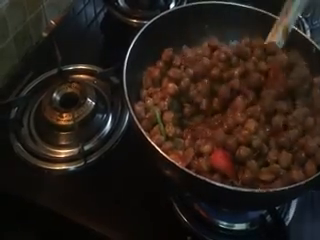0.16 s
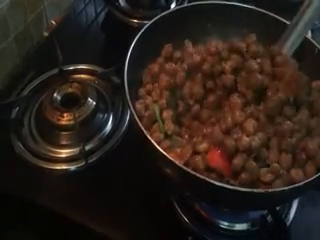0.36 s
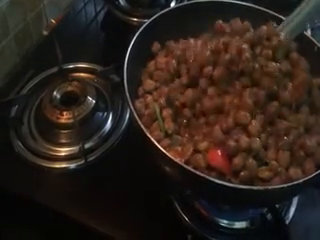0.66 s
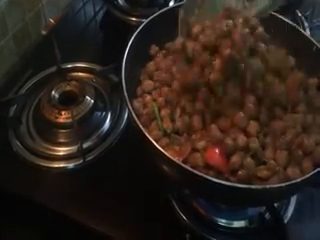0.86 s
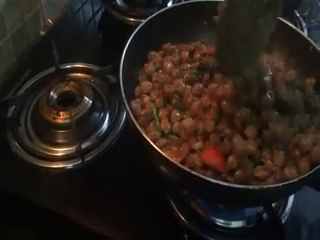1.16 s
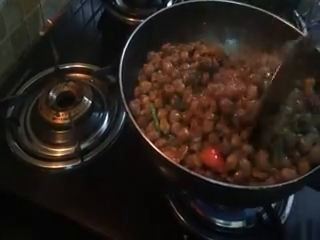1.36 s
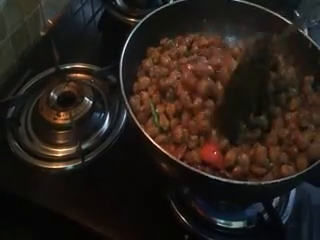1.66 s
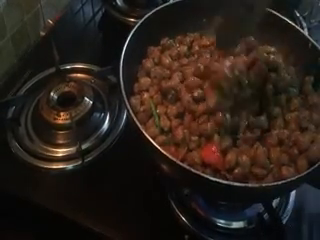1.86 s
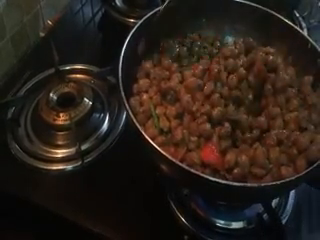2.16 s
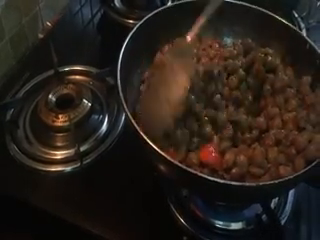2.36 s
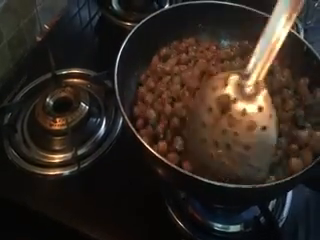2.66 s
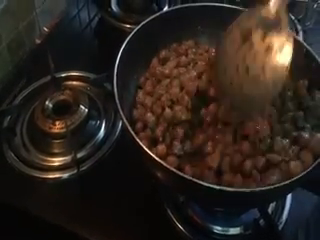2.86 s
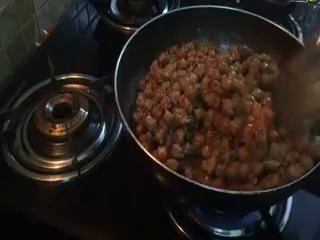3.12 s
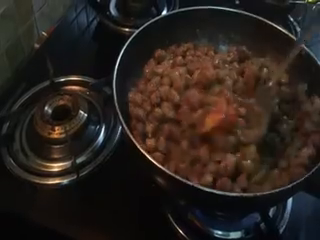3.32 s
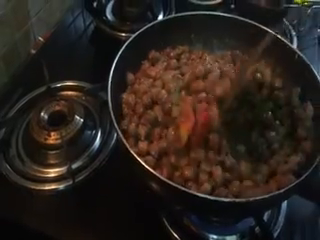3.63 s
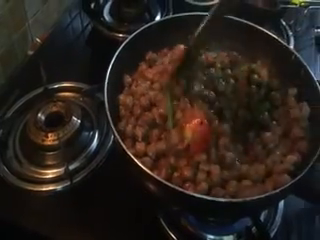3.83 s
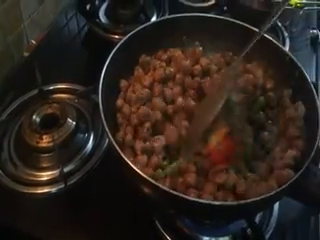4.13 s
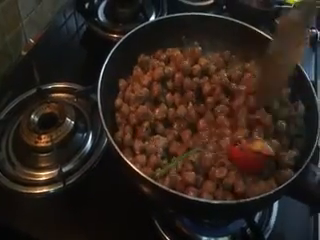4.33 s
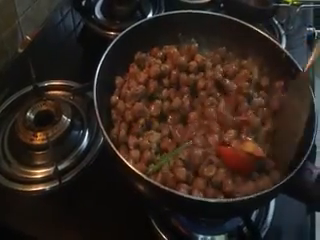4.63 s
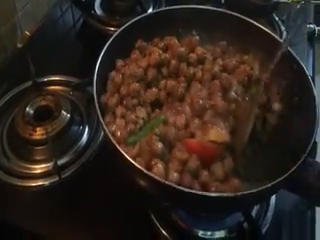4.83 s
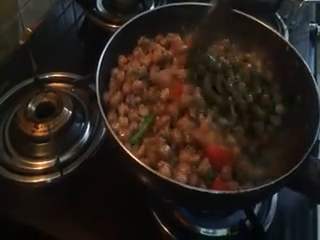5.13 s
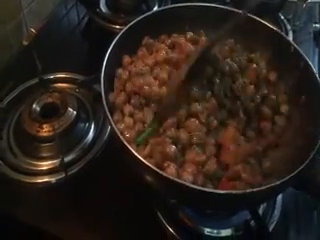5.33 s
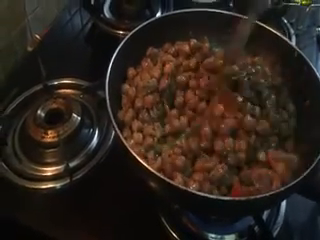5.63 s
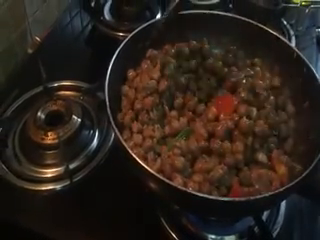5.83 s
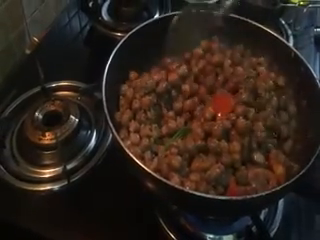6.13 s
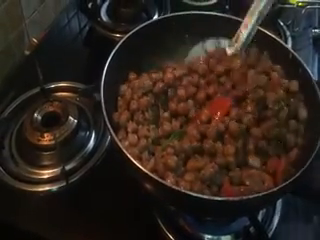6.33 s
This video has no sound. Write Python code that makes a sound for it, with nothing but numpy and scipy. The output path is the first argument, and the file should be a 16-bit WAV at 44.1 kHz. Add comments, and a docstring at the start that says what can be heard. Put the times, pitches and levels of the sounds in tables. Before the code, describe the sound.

Close to a pan of wet chickpeas in a small home kitchen, one microphone catches frying hiss over a faint low hum and rumble. The sizzle starts strong and fades quickly. Separate bright clacks and gritty scrapes of a steel skimmer follow, with short hollow ringing from the pan. Tiny droplets and fat pops crackle. After a quieter stretch come dull low thuds, another scrape, and a renewed burst of sizzling.

```python
"""Wet chickpeas sizzle in a deep steel pan on a gas ring, over a mains hum and a low roar.
A steel skimmer turns them over: strokes rub the pan's modes, blows and short scrapes ring pan and skimmer.
The sizzle is shaped noise with droplet clicks and bubble tones; a hollow band and fat pops stand out.
Low thuds are decaying sines; the kitchen answers the blows and short scrapes. One microphone feeds both
channels."""
import sys
import numpy as np
from scipy import signal
from scipy.fft import rfft, irfft, next_fast_len
from scipy.io import wavfile
from scipy.ndimage import uniform_filter1d, map_coordinates

SR = 44100
rng = np.random.default_rng(int(sys.argv[2]) if len(sys.argv) > 2 else 0)


def to_wav(sig):
    """Store sig (one row per channel, or 1-D mono) as 16-bit WAV at the path in sys.argv[1].

    Samples outside -1..1 are clipped; the rate is SR.
    """
    pcm = np.clip(np.atleast_2d(sig), -1, 1) * 32767
    pcm = np.round(pcm).astype(np.int16)
    wavfile.write(sys.argv[1], SR, pcm.T)  # frames by channels


N = 285755

# Frying strength; dies down after the water, flares when a stroke bares hot steel: time_s, level_db
FRY_LEVEL = [(0, -25), (.23, -25), (.36, -28), (.99, -32.5), (1.5, -34), (1.62, -34.5), (2.1, -34.5),
             (2.25, -31.5), (2.45, -33), (2.88, -35.5), (3.06, -35), (3.18, -34.5), (3.33, -31.5),
             (3.5, -35), (4.05, -35.5), (4.14, -37.5), (4.47, -38), (4.59, -34), (4.95, -38), (5.04, -36),
             (5.15, -37.5), (5.23, -35.5), (5.275, -38.5), (5.32, -36), (5.81, -37.5), (5.855, -42),
             (5.91, -39), (5.98, -37), (6.2, -33), (6.3, -28), (6.4, -27.5), (6.48, -31)]
# Sizzle colour: time_s, tilt_db_per_octave, hollow_db (re sizzle), pinched_share (0-1)
SIZZLE_COLOUR = [(0, 0, -8.5, .1), (.4, 0.9, -8, 0.3), (.75, 0, -9, .3), (1.0, 0.3, -12.5, .2),
                 (1.3, 1.1, -7.5, 0.1), (1.5, 2, -4, 0.2), (1.65, 0.3, -13.5, .2), (2.3, 2, -13, .2),
                 (2.6, 0, -8, .2), (2.8, 0.5, -17, .3), (4.4, 0.3, -11.5, 0.7), (5.05, 2, -10.5, 0.3),
                 (5.3, 3, -12.5, .4), (5.62, 1, -14, 0.9), (5.72, 2, -7, 0.9), (5.88, 0, -7.5, .8),
                 (5.95, -2.5, -9.5, .8), (6.2, 5, -6, 0.74), (6.32, 2.5, -12, .5), (6.48, 1.5, -11, .4)]
# Spectrum of steam and fat: freq_hz, density_db (per Hz)
FIZZ_SPECTRUM = [(250, -40), (520, -35), (850, -19), (1150, -9), (1600, -9.5), (2300, -9), (2450, -7.5),
                 (2650, -11), (2900, -8.5), (3150, -7.5), (4250, -6.5), (5000, -8.5), (5800, -6),
                 (8800, -11.5), (12000, -18.5), (15800, -28.5)]
# Modes of the pan: freq_hz, width_hz, gain_db
PAN_MODES = [(300, 160, 2), (544, 30, 6.5), (705, 37, 5), (862, 126, -4), (930, 26, -1), (1034, 41, 2.5),
             (1157, 44, -3), (1237, 67, -3.5), (1702, 34, -6), (1818, 75, -2.5), (2158, 60, 1),
             (2667, 48, -5.5), (3244, 47, -6), (3680, 80, -8), (4410, 51, -2), (5500, 110, -13),
             (6540, 100, -20), (7300, 110, -24), (8730, 140, 3.5), (9430, 120, 2)]
# Skimmer strokes along the steel: start_s, length_s, level_db
SKIMMER_STROKES = [(-.05, 0.43, -41.5), (0.444, 0.18, -51), (2.313, 0.14, -44.5), (2.997, 0.072, -40.5),
                   (3.174, 0.17, -38), (4.544, .3, -45.5), (6.043, 0.21, -42), (6.22, .35, -41.5)]
# Motor tones: freq_hz, level_db (re hum level)
HUM_TONES = [(85.4, -12.5), (100, 0.5), (129, -12), (170.5, -10), (213, -16)]
# Level of the hum: time_s, level_db
HUM_LEVEL = [(0, -44), (.6, -48), (1.44, -49), (2.8, -51), (3.18, -48), (3.63, -54), (4.17, -49),
             (5.02, -52), (5.5, -46.5), (5.92, -53.5), (6.48, -44)]
# Spectrum of the roar: freq_hz, density_db (per Hz)
ROAR_SPECTRUM = [(12, -51), (20, -22), (53, -10), (92, 1), (108, -7), (130, -7.5), (173, -7.5), (232, -11),
                 (362, -13.5), (403, -16.5), (500, -20), (650, -15.5), (1100, -120)]
# Skimmer on pan, blows and short scrapes:
# start_s, pan_db, clash_db, skimmer_db, centre_hz, spread_octaves, rub_t60_s
SKIMMER_CONTACTS = [(.185, -23.5, -31, -37, 1090, 0.24, 0.36), (.213, -21.5, -32, -32, 1900, 0.54, 0.19),
                    (1.672, -36, -28, -37, 1500, 1.1, .02), (2.1614, -13.5, -13.5, -25, 3480, 1.6, 0.028),
                    (2.1722, -20.5, -13, -30, 1010, 0.73, 0.05), (2.194, -26, -30, -40, 950, .4, 0.044),
                    (2.5911, -27, -28.5, -31, 1800, 0.87, 0.01),
                    (3.2200, -8.5, -23.5, -16, 1780, 1, 0.0037), (3.227, -16, -38, -36, 840, 0.7, .045),
                    (3.293, -26, -42, -40, 934, 0.093, .18), (3.358, -34, -45, -47, 940, .12, 0.17),
                    (4.4934, -17, -19.5, -29, 6000, 0.97, .018),
                    (4.4953, -14, -12, -10.5, 4030, 1.5, 0.004),
                    (4.661, -22.5, -29, -25, 2190, 0.45, 0.012),
                    (4.668, -24.5, -40, -28.5, 1030, 0.35, .06), (4.699, -39, -32, -24.5, 1520, 0.65, 0.17),
                    (4.7146, -27, -28, -29, 1410, 0.56, .06), (4.7443, -28, -42, -34, 1100, .3, 0.025),
                    (4.7672, -22.5, -42, -38, 928, 0.084, 0.035), (4.803, -32.5, -45, -40, 900, 0.14, .1),
                    (5.9256, -31, -27, -19, 4600, 1.6, 0.062), (5.963, -29, -30, -29, 2500, .44, 0.036),
                    (6.017, -40, -35, -44, 2100, .48, .02), (6.1, -31, -36, -30.5, 2400, 0.6, .058),
                    (6.345, -28, -38, -35, 1060, 0.15, 0.3)]
# Spectrum of steel edge on steel: freq_hz, density_db (per Hz)
CLASH_SPECTRUM = [(470, -41), (800, -0.5), (1900, -6.5), (2440, 0.5), (2910, -6.5), (3220, 3), (3830, -14),
                  (5510, 1.5), (8990, -4), (14300, -12.5), (16000, -23)]
# Modes of the skimmer: freq_hz, width_hz, gain_db
SKIMMER_MODES = [(1495, 30, 6.5), (2304, 45, -4), (2430, 44, 1.5), (2880, 130, -3), (3280, 41, -4),
                 (4150, 49, -2.5), (4970, 37, 3.5), (5600, 86, -6), (6510, 63, -4.5), (7630, 140, -4)]
# Decay of the room: freq_hz, t60_s
KITCHEN_DECAY = [(300, 0.56), (2000, 0.2), (10000, 0.2)]
# Fat pops above the sizzle: start_s, peak_db, pitch_hz
FAT_POPS = [(.25, -16, 5070), (.367, -20, 5000), (.530, -16, 6000), (1.046, -24, 6500), (1.147, -26, 4500),
            (1.992, -23, 5500), (2.366, -31, 5700), (5.095, -25, 12500), (5.224, -22.5, 6500),
            (5.825, -29, 12000)]
# Low thuds: start_s, level_db, pitch_hz
LOW_THUDS = [(2.223, -36, 135), (3.222, -32, 102), (3.222, -37.5, 329), (5.496, -23, 147.4),
             (5.538, -27, 109), (5.562, -26.5, 152)]

BOWL_WIDE_HZ, BOWL_WIDE_WIDTH_HZ = 2038, 460
BOWL_NARROW_HZ, BOWL_NARROW_WIDTH_HZ = 1975, 210
STROKE_EDGE_S = 0.036  # rise and fall
TUMBLE_DB = -15  # re sizzle
ROAR_DB = -47
CLASH_T60_S, CLASH_RISE_S = 0.04, 0.00059
KNOCK_DB, KNOCK_LOSS_DB_PER_S = -5.5, 41  # re pan ring; loss per second of rub t60
ROOM_DB = -7.0
POP_PEAK_CYCLES = 1.6  # envelope peak
THUD_T60_S, THUD_RISE_S = 0.15, 0.0014
TOP_HZ = 15830


def amp(db):
    """Gain of a level in dB."""
    return 10 ** (np.asarray(db) / 20)


def unit(x):
    """x at rms 1."""
    return x / np.sqrt(np.mean(x ** 2) + 1e-20)


def along(points, hz):
    """Values of (Hz, value) points, interpolated on a log axis."""
    point_hz, value = np.transpose(points)
    return np.interp(np.log(hz + 1), np.log(point_hz + 1), value)


def curve(table, column, t):
    """One column of a timed table at times t."""
    rows = np.array(table)
    return np.interp(t, rows[:, 0], rows[:, column])


def wobble(knots_per_s):
    """Smooth random curve through normal knots."""
    knots = rng.standard_normal(int(N * knots_per_s / SR) + 4)
    return map_coordinates(knots, [np.arange(N) * knots_per_s / SR])


def patches(shape, bands, frames):
    """Random field of rms 1, smooth over some bands and frames."""
    across_bands = uniform_filter1d(rng.standard_normal(shape), bands, 0)
    return unit(uniform_filter1d(across_bands, frames, 1))


def filtered(x, response):
    """x times a complex response of frequency."""
    m = next_fast_len(x.shape[-1] + SR // 2)
    spectrum = rfft(x, m) * response(np.fft.rfftfreq(m, 1 / SR))
    return irfft(spectrum, m)[..., :x.shape[-1]]


def coloured(x, spectrum):
    """Noise x given a spectrum, at rms 1."""
    return unit(filtered(x, lambda hz: amp(along(spectrum, hz))))


def resonance(f, hz, width_hz):
    """Causal resonant peak of height 1."""
    return 1j * f * width_hz / (hz * hz - f * f + 1j * f * width_hz)


def modes(table, centre_hz, spread_octaves):
    """Response of the modes near a centre, neighbours of opposite sign."""
    def response(f):
        total = 0
        for k, (hz, width_hz, db) in enumerate(table):
            near = np.exp(-.5 * (np.log2(hz / centre_hz) / spread_octaves) ** 2)
            total = total + (-1) ** k * amp(db) * near * resonance(f, hz, width_hz)
        return total
    return response


def spatter(per_second, spread_db):
    """Bursting droplets: sparse clicks, a few larger than the rest."""
    bursts = rng.random(N) < per_second / SR
    size_db = spread_db * np.minimum(rng.exponential(size=N), 3)
    return unit(bursts * rng.standard_normal(N) * amp(size_db))


def bubbles(per_second, centre_hz=3800, spread=.5, cycles=5, size_db=1.8):
    """Small bubbles: each a short tone that starts softly and rises a little."""
    when, pitch, size = rng.random((int(per_second * N / SR), 3)).T
    scatter = spread * np.log(pitch / (1 - pitch)) / 1.71  # logistic, in log frequency
    hz = np.clip(centre_hz * np.exp(scatter), 900, 12000)[:, None]
    k = np.arange(640)
    turns = hz * k / SR
    level = amp(size_db * np.minimum(-np.log(size), 3))[:, None] * np.minimum(hz / centre_hz, 1)
    envelope = np.exp(-turns / cycles) * (1 - np.exp(-turns / 2))
    tones = level * envelope * np.sin(2 * np.pi * turns * (1 + 0.0019 * turns))
    places = (when * N).astype(int)[:, None] + k
    return unit(np.bincount(places.ravel(), tones.ravel(), N + len(k))[:N])


def sizzle(broad_db=1.13, narrow_db=1.5, bubble_db=-10, spatter_db=-7, flutter_db=0.84, crackle_db=.6):
    """Steam hiss with droplets and bubbles; spots of the pan flare up and narrow bands of it shift."""
    raw = rng.standard_normal(N) + amp(spatter_db) * spatter(2500, spread_db=2.5)
    hz, t, z = signal.stft(raw, SR, nperseg=512)
    patchy_db = broad_db * patches(z.shape, 12, 6) + narrow_db * patches(z.shape, 2, 4)
    octaves = np.log2(np.clip(hz, 500, None) / 6000)[:, None]
    tilt_db = curve(SIZZLE_COLOUR, column=1, t=t) * octaves
    hiss = signal.istft(z * amp(patchy_db + tilt_db), SR, nperseg=512)[1][:N]
    fry = unit(coloured(hiss, FIZZ_SPECTRUM) + amp(bubble_db) * bubbles(per_second=600))
    level_db = curve(FRY_LEVEL, column=1, t=np.arange(N) / SR)
    return amp(level_db + flutter_db * wobble(14) + crackle_db * wobble(300)) * fry


def hollow():
    """The air in the bowl lifts one fluttering band of the sizzle, pinched when the peas are heaped up."""
    def band(hz, width_hz):
        noise = rng.standard_normal(N)
        return unit(filtered(noise, lambda f: resonance(f, hz, width_hz) ** 2))

    t = np.arange(N) / SR
    wide = band(BOWL_WIDE_HZ, BOWL_WIDE_WIDTH_HZ)
    narrow = band(BOWL_NARROW_HZ, BOWL_NARROW_WIDTH_HZ)
    share = np.clip(curve(SIZZLE_COLOUR, column=3, t=t), 0, 1)
    level_db = curve(FRY_LEVEL, column=1, t=t) + curve(SIZZLE_COLOUR, column=2, t=t)
    flutter_db = 0.66 * wobble(9.1) + 1.9 * wobble(25)
    return amp(level_db + flutter_db) * (np.sqrt(1 - share) * wide + np.sqrt(share) * narrow)


def rubbing_gain():
    """Gain of the rubbing: a steady tumble that follows the frying, and the strokes on top."""
    t = np.arange(N) / SR
    power = amp(curve(FRY_LEVEL, column=1, t=t) + TUMBLE_DB) ** 2
    for start_s, length_s, db in SKIMMER_STROKES:
        rise = np.clip((t - start_s) / STROKE_EDGE_S, 0, 1)
        fall = np.clip((start_s + length_s - t) / STROKE_EDGE_S, 0, 1)
        power += (amp(db) * rise * fall) ** 2
    return np.sqrt(power)


def scrape(uneven_db=2.5):
    """The skimmer and the tumbling peas rub the steel and keep its low modes sounding."""
    grit = rng.standard_normal(N) + 0.28 * spatter(900, spread_db=1.0)
    ringing = unit(filtered(grit, modes(PAN_MODES, centre_hz=1304, spread_octaves=0.6)))
    return rubbing_gain() * amp(uneven_db * wobble(22)) * ringing


def streaked(x, depth_db=5.5, centre_hz=2300, spread_octaves=1.22):
    """Narrow bands of the middle range dip, each for a moment."""
    hz, _, z = signal.stft(x, SR, nperseg=1024)
    reach = np.exp(-.5 * (np.log2((hz + 1) / centre_hz) / spread_octaves) ** 2)[:, None]
    dips = np.minimum(patches(z.shape, 3, 6) + 0.28, 0)
    return signal.istft(z * amp(depth_db * reach * dips), SR, nperseg=1024)[1][:N]


def motor_hum():
    """Steady tones of a motor, the strongest at twice the mains rate, waver in level and phase."""
    t = np.arange(N) / SR
    tones = np.zeros(N)
    for hz, db in HUM_TONES:
        phase = 2 * np.pi * hz * t + 0.2 * wobble(2.5)
        tones += amp(db + 1.0 * wobble(3.17)) * np.sqrt(2) * np.sin(phase)
    return tones * amp(curve(HUM_LEVEL, column=1, t=t))


def roar():
    """Low shaped noise, slowly wavering."""
    return amp(ROAR_DB + 1.2 * wobble(2.87)) * coloured(rng.standard_normal(N), ROAR_SPECTRUM)


def clash(t, db):
    """Steel edges chatter: a short decaying burst of shaped noise."""
    envelope = amp(db - 60 * t / CLASH_T60_S) * (1 - np.exp(-t / CLASH_RISE_S))
    return envelope * coloured(rng.standard_normal(len(t)), CLASH_SPECTRUM)


def knock(t, pan_db, hz, rub_t60_s):
    """Dead knock, gone in a few cycles; the longer the rub, the softer."""
    turns = hz * t
    level = amp(pan_db + KNOCK_DB - KNOCK_LOSS_DB_PER_S * rub_t60_s)
    return level * turns * np.exp(1 - turns) * np.sin(2 * np.pi * turns)


def contact_ring(t, pan_db, skimmer_db, centre_hz, spread_octaves, rub_t60_s):
    """A first contact and a short or long decaying rub drive the modes of pan and skimmer."""
    drive = rng.standard_normal(len(t)) * amp(-60 * t / rub_t60_s)
    drive[0] = 9  # first contact
    sound = np.zeros(len(t))
    for table, db in ((PAN_MODES, pan_db), (SKIMMER_MODES, skimmer_db)):
        ring = filtered(drive, modes(table, centre_hz, spread_octaves))
        sound += amp(db) * ring / np.abs(ring).max()
    return sound


def contacts():
    """Each blow or short scrape is a clash of edges, a dead knock and a ring of pan and skimmer."""
    out, t = np.zeros(N + SR), np.arange(SR // 2) / SR
    for start_s, pan_db, clash_db, skimmer_db, centre_hz, spread_octaves, rub_t60_s in SKIMMER_CONTACTS:
        sound = clash(t, clash_db) + knock(t, pan_db, centre_hz, rub_t60_s)
        sound += contact_ring(t, pan_db, skimmer_db, centre_hz, spread_octaves, rub_t60_s)
        out[round(start_s * SR):][:len(t)] += sound
    return out[:N]


def kitchen(x):
    """Each frequency of the room's answer dies at its own speed."""
    hz, t, z = signal.stft(rng.standard_normal(SR // 2), SR, nperseg=256)
    decay = amp(-60 * t / along(KITCHEN_DECAY, hz)[:, None])
    tail = signal.istft(z * decay, SR, nperseg=256)[1]
    delayed = np.pad(x, (200, 0))  # samples
    return signal.fftconvolve(delayed, tail / np.linalg.norm(tail))[:N]


def pops():
    """Each fat pop is a tone of a few cycles."""
    out, t = np.zeros(N + SR), np.arange(SR // 100) / SR
    for start_s, db, hz in FAT_POPS:
        turns = hz * t
        envelope = turns / POP_PEAK_CYCLES * np.exp(1 - turns / POP_PEAK_CYCLES)
        out[round(start_s * SR):][:len(t)] += amp(db) * envelope * np.sin(2 * np.pi * turns)
    return out[:N]


def thuds():
    """Soft low bumps: decaying sines with a rounded onset."""
    out, t = np.zeros(N + SR), np.arange(SR // 3) / SR
    for start_s, db, hz in LOW_THUDS:
        envelope = amp(db - 60 * t / THUD_T60_S) * (1 - np.exp(-t / THUD_RISE_S))
        out[round(start_s * SR):][:len(t)] += envelope * np.sin(2 * np.pi * hz * t)
    return out[:N]


def scene():
    """Everything reaches one microphone; only the blows and short scrapes get the room's answer."""
    food = streaked(sizzle() + hollow() + scrape())
    metal = contacts()
    metal_in_room = metal + amp(ROOM_DB) * kitchen(metal)
    mono = food + motor_hum() + roar() + metal_in_room + pops() + thuds()
    return np.array([mono, mono])


def record(dry):
    """The loudest peaks are rounded off, the treble has a narrow dip, nothing is kept above TOP_HZ."""
    rounded = dry / (1 + np.abs(dry / .65) ** 4) ** (1 / 4)
    return filtered(rounded, lambda hz: (1 - 0.41 * resonance(hz, 10600, 410)) * (hz < TOP_HZ))


dry = scene()
out = record(dry)
to_wav(out)
```